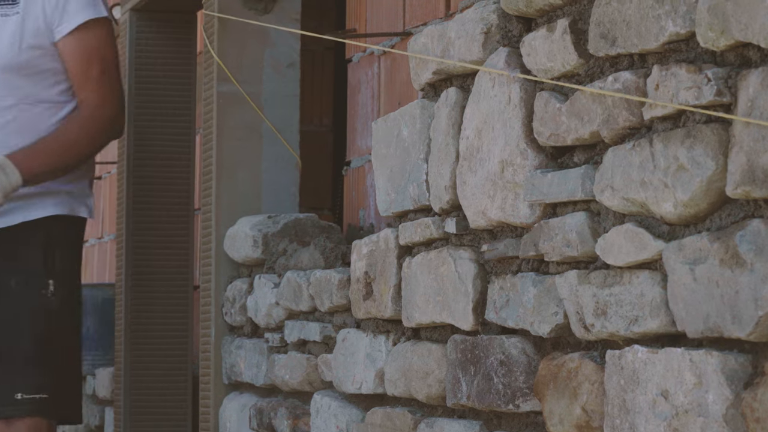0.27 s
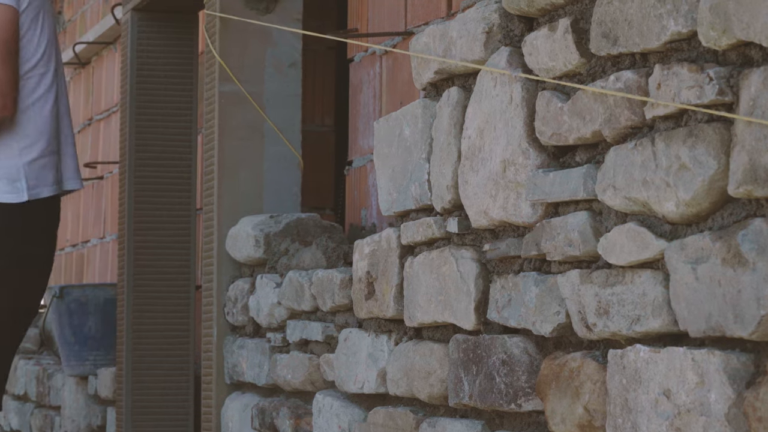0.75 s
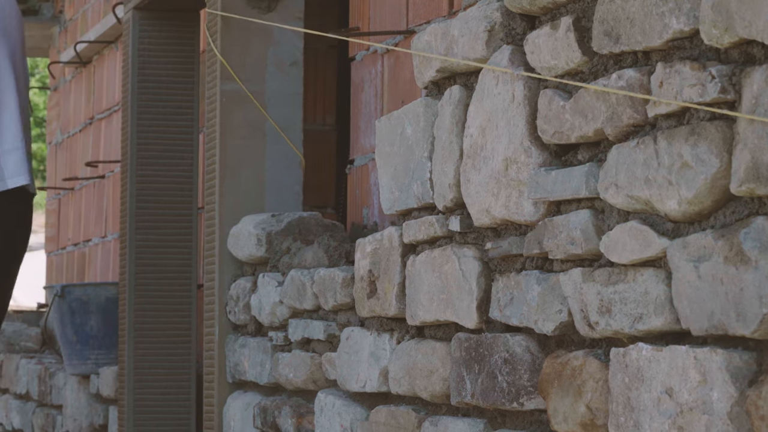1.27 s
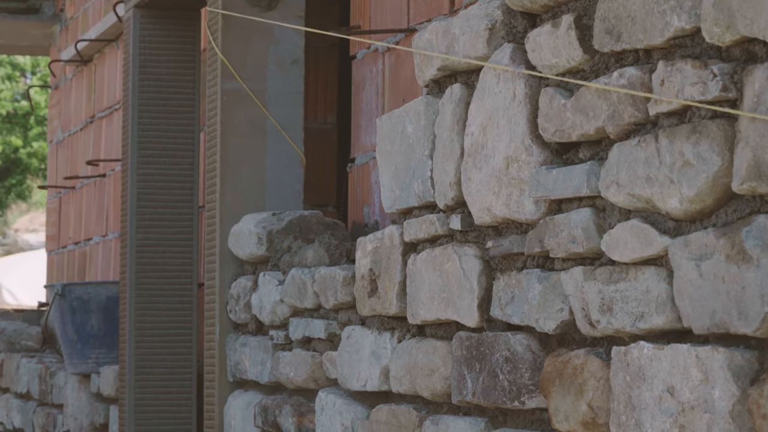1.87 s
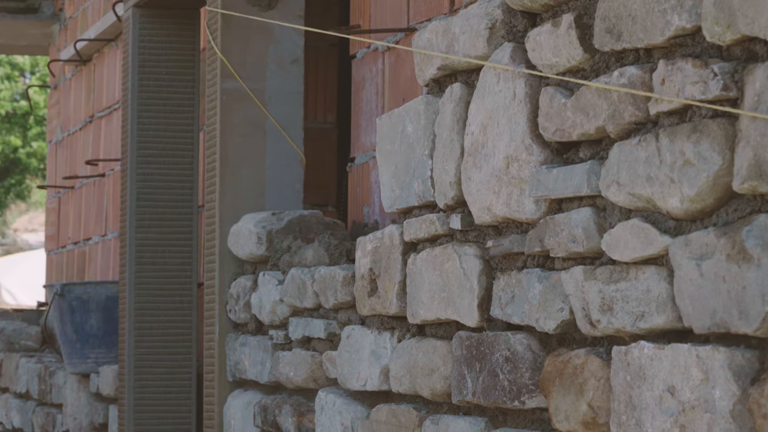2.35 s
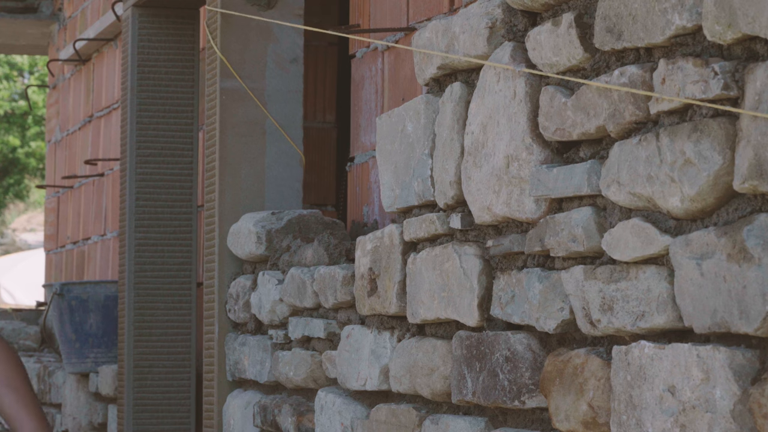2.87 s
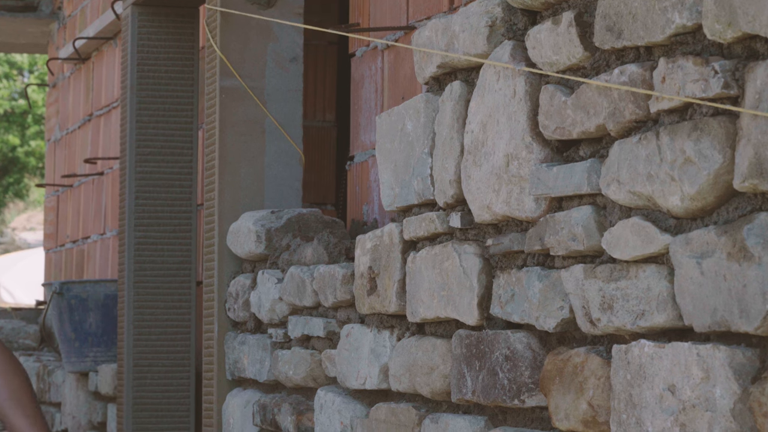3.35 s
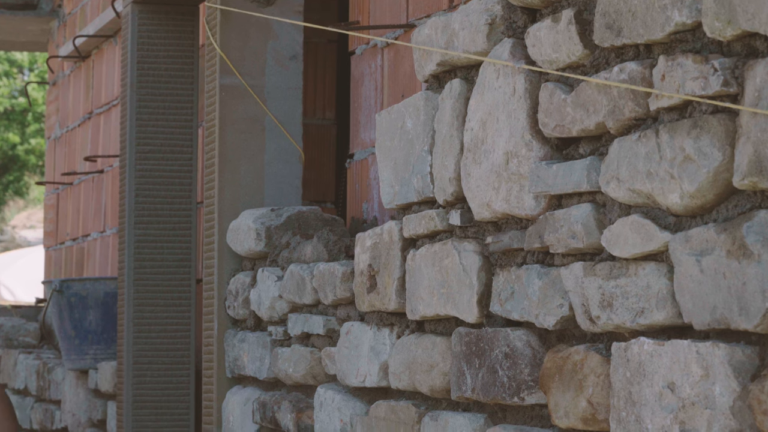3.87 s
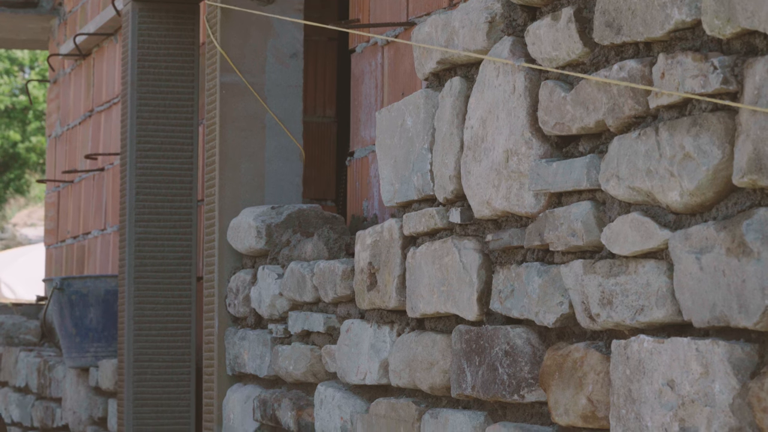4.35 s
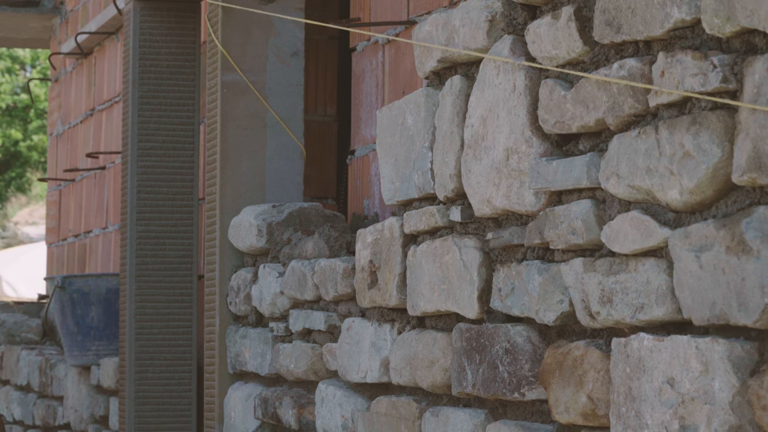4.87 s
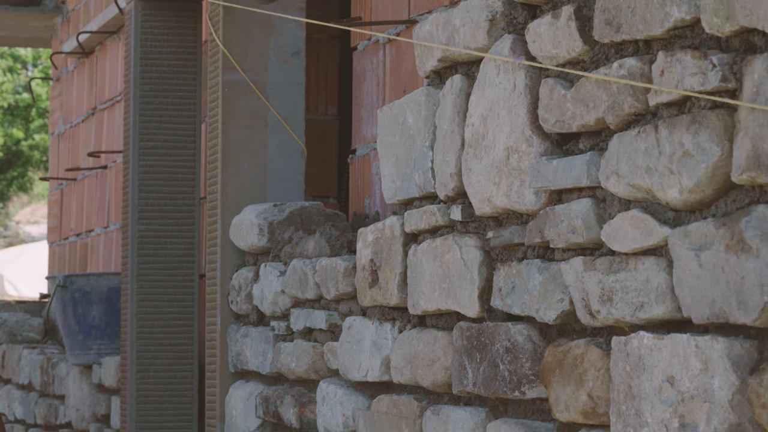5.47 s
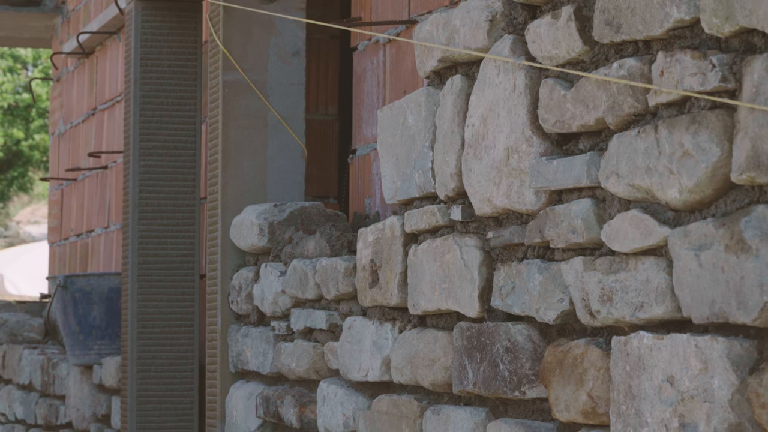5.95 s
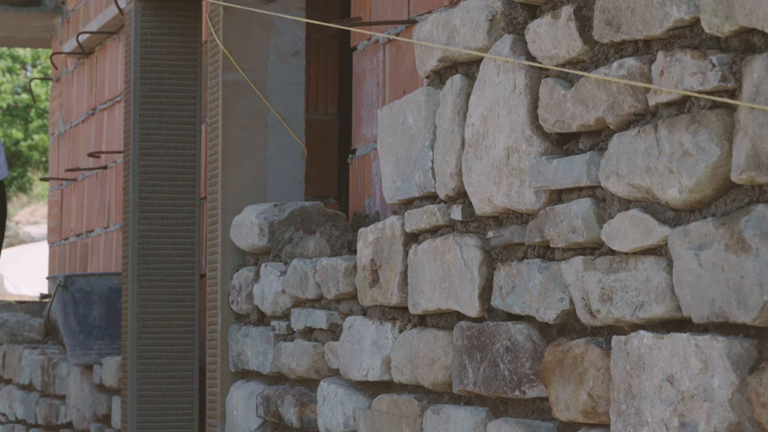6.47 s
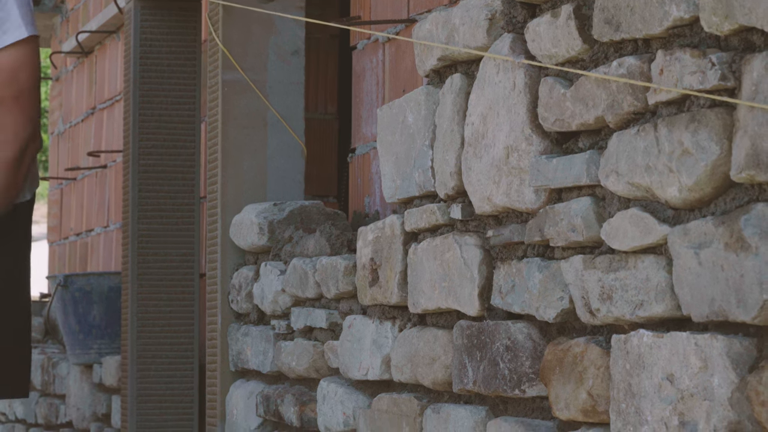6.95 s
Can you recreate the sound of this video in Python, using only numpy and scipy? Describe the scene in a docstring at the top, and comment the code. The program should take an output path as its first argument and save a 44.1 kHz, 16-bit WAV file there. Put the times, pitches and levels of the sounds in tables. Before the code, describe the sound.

Faint stone ticks and grinding give way to loud sharp rock-on-rock clacks and mortar swishes, booming in a bare building before quiet blade scrapes.

```python
"""Inside a bare, half-built house, rough stones are picked from a pile, dropped and ground into place.
Knocks and chips are short bursts of shaped noise; grinding is noise that slips and catches.
A steel blade clinks and rasps through its resonances; close on the left, mortar hisses in gritty swishes.
The brick shell answers with a low boom of fading noise, over a faint outdoor hiss with thin tones."""
import sys
import numpy as np
from scipy import signal
from scipy.fft import rfft, irfft, next_fast_len
from scipy.io import wavfile
from scipy.ndimage import uniform_filter1d, map_coordinates

SR = 44100
rng = np.random.default_rng(int(sys.argv[2]) if len(sys.argv) > 2 else 0)


def pcm_store(signal):
    """Save signal as 16-bit PCM."""
    levels = np.round(np.clip(np.atleast_2d(signal), -1, 1) * 32767)
    wavfile.write(sys.argv[1], SR, levels.astype(np.int16).T)


N = 317961  # length of the scene [samples]
TOP_HZ = 16100  # no sound is kept above this

# In every table, levels are relative. A "fade time" is the time to fall by 60 dB.
# stone on stone: (time [s], level [dB], hardness [0-1], ring pitch [Hz], basic fade time [s])
STONE_KNOCKS = [(0.175, -43, 0.97, 950, 0.19), (0.320, -39.5, 0.5, 498, 0.35),
                (0.878, -40.5, 1, 1070, 0.38), (1.921, -40, 1, 914, 0.17), (3.153, -29, 0.32, 947, 0.36),
                (3.178, -28.5, 0.4, 890, 0.36), (3.3577, -4, .88, 793, 0.34),
                (3.397, -10.5, 0.93, 629, 0.55), (3.544, -22.5, 0.96, 884, .16), (3.636, -20, 0, 864, 0.39),
                (3.673, -15, 1, 938, 0.37), (3.775, -12, 0.87, 674, 0.29), (4.596, -20, 0.69, 1100, 0.32),
                (4.676, -20.5, 0, 914, 0.18), (4.79, -25.5, 0, 960, 0.26), (4.882, -36.5, 1, 920, .2),
                (4.965, -14, 0, 556, 0.17), (5.305, -17, 0.48, 850, 0.2), (5.318, -4, 0.81, 843, 0.23),
                (5.427, -18.5, 0.3, 778, 0.21), (5.879, -24, 0.04, 933, 0.3),
                (5.938, -16.5, 0.08, 603, 0.18)]
# small chips that fall, and a few short, dead stone knocks: (time [s], level [dB], ring pitch [Hz])
DRY_TICKS = [(0.142, -48.5, 900), (1.561, -50, 694), (1.674, -42, 800), (3.207, -33, 780),
             (5.112, -23, 795), (5.202, -36, 847), (5.257, -39, 900), (6.167, -39, 800),
             (6.854, -29, 1000), (6.905, -41, 980), (6.948, -38, 955)]
# one push of a stone over another: (time [s], length [s], grind level [dB], sand level [dB])
STONE_PUSHES = [(0.41, 0.18, -53, -54.5), (0.69, 0.17, -74, -53.5), (1.058, 0.066, -52, -50),
                (1.579, 0.093, -47, -46.5), (1.742, 0.082, -76, -50.5), (2.617, 0.087, -58.5, -49.5),
                (2.726, 0.17, -54, -53), (2.929, 0.053, -38, -44), (2.984, 0.041, -36, -49),
                (3.2, 0.057, -35, -43), (3.426, 0.045, -24, -45), (3.512, 0.12, -31, -41),
                (3.664, 0.12, -22, -27), (4.046, 0.048, -50.5, -51), (4.386, 0.074, -56, -51.5),
                (4.606, 0.048, -27.5, -71), (4.87, 0.14, -32, -42.5), (5.123, 0.026, -35, -46.5),
                (5.236, 0.16, -39.5, -60), (6.86, 0.21, -48.5, -55), (7.141, 0.051, -51.5, -48)]
# the blade on stone: (time [s], level [dB], contact length [s], centre of the rasp [Hz])
BLADE_TOUCHES = [(3.36, -26, 0.1, 5060), (3.672, -27, .005, 6500), (3.767, -26, 0.0037, 6560),
                 (4.756, -45.5, 0.022, 4070), (4.884, -46.5, 0.014, 3500), (6.428, -41, .03, 3900),
                 (6.593, -41.5, 0.031, 1620), (6.750, -41.5, 0.022, 4350), (7.052, -39.5, 0.0089, 3800)]
# quick scrapes through mortar: (time [s], level [dB], rise [s], length [s], brightness [dB per octave])
MORTAR_SCRAPES = [(2.059, -25.5, 0.0025, 0.049, 3.5), (5.439, -22.5, 0.0044, 0.055, 3.5),
                  (6.329, -43.5, .04, 0.071, 1.5), (7.055, -37, 0.0013, 0.011, -1)]
# resonances of the steel blade: (frequency [Hz], width [Hz], level [dB])
STEEL_MODES = [(1270, 45, 14), (2000, 60, 6), (2480, 40, -2), (3730, 30, -2), (3993, 25, 0), (4180, 45, -1),
               (4284, 22, -3), (4477, 14, -1), (5290, 70, 0), (5470, 60, 4), (5660, 40, -1), (5840, 60, -1),
               (6240, 7, 4), (7046, 50, 0), (8429, 25, -5)]
# resonances of the pile and its corner: (frequency [Hz], width [Hz], level [dB])
CORNER_MODES = [(138, 4.4, 6.5), (244.5, 7.4, 9), (289.6, 12, 3.5), (361.6, 16, 2.5), (403, 12, -22),
                (533, 2.3, 1.5), (639.5, 12.5, 5), (722, 34, 2.5), (836, 3.1, 5.5), (931, 153, 2.5),
                (1030, 10, 2), (1105, 7.7, 8), (1346, 21, 1), (1500, 4.4, -31), (1670, 11, 0.5),
                (2000, 21, -14)]
# tone colour of a stone blow: (frequency [Hz], level [dB per Hz])
STONE_COLOUR = [(30, -62), (70, -22), (120, -25), (190, -10.5), (250, 1), (400, 3), (500, 4.5), (750, 6),
                (1100, 1), (1800, -22), (3200, -30), (5600, -29), (8000, -39), (16000, -50.5)]
# tone colour of stone grinding on stone: (frequency [Hz], level [dB per Hz])
GRIND_COLOUR = [(47, -74), (80, -16), (162, -18), (260, -5.5), (552, -4), (902, -5.5), (1190, -8),
                (1310, -6.5), (1790, -16.5), (3290, -31), (4000, -22), (5200, -44), (8800, -120)]
# tone colour of sand crunching: (frequency [Hz], level [dB per Hz])
SAND_COLOUR = [(800, -38), (2000, 7.5), (4000, 4), (6000, 4), (9000, -3), (16000, -9)]
# tone colour of scraped mortar: (frequency [Hz], level [dB per Hz])
MORTAR_COLOUR = [(120, -30.5), (220, -19), (450, -1), (1000, -3), (1400, 5.5), (2200, 5), (3200, 0.5),
                 (5500, -4.5), (8000, -0.5), (10500, -4.5), (14000, -15.5), (16000, -13.5)]
# tone colour of the outdoor hiss: (frequency [Hz], level [dB per Hz])
AIR_COLOUR = [(18, -81.5), (30, -47.5), (157, -14.5), (345, -12), (526, -6), (780, -8), (1390, -10),
              (1670, -10.5), (1810, -10), (3060, -14.5), (3580, -15), (6380, -16), (7870, -16),
              (16000, -21)]
# slow drift of the outdoor hiss: (time [s], level [dB])
AIR_DRIFT = [(0, -56.5), (2.4, -57), (4.4, -54.5), (5.8, -54), (7.2, -52.5)]
# faint, thin tones: (frequency [Hz], level [dB])
THIN_TONES = [(1775, -69), (3560, -73), (7697, -73.5)]
# how alike left and right are, for sound from the house: (frequency [Hz], likeness [-1 to 1])
HOUSE_LIKENESS = [(150, .998), (400, 0.98), (900, 0.83), (1600, 0.41), (2800, 0.024), (6000, 0.041)]
# the same for near sound from the left: (frequency [Hz], likeness [-1 to 1])
NEAR_LIKENESS = [(400, 0.75), (900, 0.73), (1600, -0.44), (4000, -0.64), (8000, 0.39), (15000, -0.38)]
# the same for open air: (frequency [Hz], likeness [-1 to 1])
OPEN_LIKENESS = [(150, 0.97), (450, 0.71), (1000, 0.3), (2500, -0.36), (6000, -0.06)]
# how far the work leans to the left: (frequency [Hz], left minus right [dB])
LEFT_LEAN = [(300, -1.5), (700, 1.5), (1400, 3), (3000, 1.3), (9000, 1.5)]
# the ringing brick shell: (frequency [Hz], fade time [s], level [dB])
BRICK_SHELL = [(112, 2.78, 4.5), (278, 1.08, 2.5), (980, 1.08, -4), (2500, 0.83, -3), (6000, 0.72, -2),
               (14000, 0.6, -20)]

# what hardness does to each band, low to high:
# (share when soft [dB], share when hard [dB], life [times the basic fade time])
THUD, BODY, CLACK, CRACK = (-16, -21, 0.9), (-11.5, -10.5, 1), (-25, -9.5, 1.04), (-44, -13.5, 0.89)
# every push takes hold, bears down harder to its end, then lets go
PUSH_RISE_S, PUSH_SWELL_DB, PUSH_RELEASE_T60 = 0.0089, 4, 0.27


def amp(db):
    """Turn decibels into a gain."""
    return 10 ** (np.asarray(db) / 20)


def unit(x):
    """Scale x to an rms of 1."""
    return x / np.sqrt(np.mean(x ** 2) + 1e-20)


def along(points, hz):
    """Read values between (frequency, value) points, on a log frequency axis."""
    f, v = np.transpose(points)
    return np.interp(np.log(hz + 1), np.log(f + 1), v)


def wobble(rate, size):
    """A smooth random curve with `rate` random points a second."""
    knots = rng.standard_normal(int(size * rate / SR) + 4)
    return map_coordinates(knots, [np.arange(size) * rate / SR])


def filtered(x, response):
    """Shape x by a gain that depends on frequency."""
    n = x.shape[-1]
    padded = next_fast_len(n + SR // 8)
    spectrum = rfft(x, padded) * response(np.fft.rfftfreq(padded, 1 / SR))
    return irfft(spectrum, padded)[..., :n]


def resonances(modes, f):
    """Summed response of ringing modes, each given as (Hz, width in Hz, dB)."""
    return sum(amp(db) * 1j * f * w / (c * c - f * f + 1j * f * w) for c, w, db in modes)


def pair(alike, size):
    """White stereo noise whose two sides are as alike as the table says."""
    def middle_and_side(f):
        turn = np.arccos(np.clip(along(alike, f), -1, 1)) / 2
        return np.array([np.cos(turn), np.sin(turn)])

    mid, side = filtered(rng.standard_normal((2, size)), middle_and_side)
    return np.array([mid + side, mid - side])


def stroke(t, rise, hold, t60):
    """An envelope that rises, holds and dies away."""
    return (1 - np.exp(-t / rise)) * amp(-60 * np.maximum(t - hold, 0) / t60)


def add(track, s, sound):
    """Mix a sound into the track at s seconds."""
    part = track[:, round(s * SR):][:, :sound.shape[1]]
    part += sound[:, :part.shape[1]]


def air(level_db=3.0):
    """Outdoor hiss is shaped noise that drifts slowly, with a few thin wavering tones."""
    t = np.arange(N) / SR
    hiss = unit(filtered(pair(OPEN_LIKENESS, N), lambda f: amp(along(AIR_COLOUR, f))))
    hiss_db = np.interp(t, *np.transpose(AIR_DRIFT)) + level_db
    waver = 3 * np.array([wobble(17, N), wobble(20, N)])  # phase [radians], one curve a side
    tones = sum(amp(db) * unit(np.sin(2 * np.pi * hz * t + waver)) for hz, db in THIN_TONES)
    return amp(hiss_db) * hiss + tones


def chips(width_hz=220, t60=0.067, level_db=-4, hold_s=0.0035, dull_hz=1700):
    """Small pieces land, and some short blows die at once, with a dry tick: a tiny noise burst through a broad
    resonance."""
    out, t = np.zeros((2, N)), np.arange(SR // 8) / SR
    for s, db, hz in DRY_TICKS:
        modes = [(hz, width_hz, 0), (2000, 500, -14)]
        colour = lambda f: resonances(modes, f) / np.sqrt(1 + (f / dull_hz) ** 6)
        burst = pair(HOUSE_LIKENESS, len(t)) * stroke(t, 0.0012, hold_s, t60)
        tick = filtered(burst, colour)
        add(out, s, amp(db + level_db) * tick / np.std(tick[:, :SR // 100]))
    return out


def shell(x):
    """The bare rooms ring on as a tail of fading noise, longest in the bass."""
    hz, t, noise = signal.stft(pair(HOUSE_LIKENESS, SR * 3 // 2), SR, nperseg=512)
    t60 = along([(f, life) for f, life, db in BRICK_SHELL], hz)[:, None]
    colour_db = along([(f, db) for f, life, db in BRICK_SHELL], hz)[:, None]
    fading = noise * amp(colour_db - 60 * t / t60) * (1 - np.exp(-t / 0.0022))
    tail = signal.istft(fading, SR, nperseg=512)[1]
    return signal.fftconvolve(x.mean(0)[None], tail / np.sqrt(SR / 10), axes=1)[:, :N]


def facets(f, count=10):
    """Every rough stone has its own scatter of narrow upper resonances."""
    centres = np.geomspace(1400, 9000, count) * np.exp(.1 * rng.standard_normal(count))
    modes = [(hz, 35 + hz / 150, 5) for hz in centres]
    return np.sqrt(1 + np.abs(resonances(modes, f)) ** 2)


def knocks(ring_db=-5.5, ring_t60=0.11, snap_db=-2, snap_t60=0.012, edge_db=8, rattle_db=2,
           heft_db=6, soft_rise_s=0.0024, click_db=-15, click_t60=.03):
    """Each blow is a snap, a short ring and a dense scatter off the near walls; hard contacts reach higher."""
    out, t = np.zeros((2, N)), np.arange(SR * 2 // 3) / SR
    edges = [20, 400, 1600, 3200, 20000]  # borders of the four bands [Hz]
    for s, db, hardness, hz, t60 in STONE_KNOCKS:
        # soft contacts take hold slowly
        attack = 1 - np.exp(-t / (0.00053 + soft_rise_s * (1 - hardness) ** 2))
        stone = lambda f: amp(along(STONE_COLOUR, f)) * facets(f)
        noise = filtered(pair(HOUSE_LIKENESS, len(t)), stone)
        rattle = amp(rattle_db * wobble(219, len(t)))  # rough faces touch at many points
        for lo, hi, (soft_db, hard_db, life) in zip(edges, edges[1:], [THUD, BODY, CLACK, CRACK]):
            band = filtered(noise, lambda f: 1 / (1 + (f / hi) ** 10) - 1 / (1 + (f / lo) ** 10))
            # the first contact is brightest
            snap = amp(snap_db + edge_db * (lo > 2000) - 60 * t / snap_t60)
            envelope = stroke(t, .003, .006, t60 * life) + snap
            blow = band * attack * envelope * rattle
            # heavy blocks rumble longer and thud more
            weight_db = heft_db * np.log2(t60 / 0.23) * (lo == edges[0])
            share_db = soft_db + hardness * (hard_db - soft_db) + weight_db
            add(out, s, amp(db + share_db) * blow / np.std(blow[:, :SR // 40]))
        # only a really hard contact chips the edge with a clear white-noise click
        click = pair(HOUSE_LIKENESS, len(t)) * stroke(t, .001, 0, click_t60)
        add(out, s, amp(db + click_db) * np.clip(hardness, 0, 1) ** 6 * click)
        # the block's own two lowest modes, each a close pair that beats
        for ratio, mode_db in [(1, 0.5), (1.5, -3)]:
            twins_hz = hz * ratio * (1 + 0.013 * rng.standard_normal((2, 1)))
            phase = 2 * np.pi * (twins_hz * t + rng.random((2, 1)) / 3)
            ring = np.sin(phase).mean(0)
            fade = amp(db + ring_db + mode_db - 60 * t / ring_t60)
            add(out, s, (fade * attack * ring)[None])
    return out


def hollow(f, depth=0.52):
    """The direct sound plus the ringing of the pile's corner."""
    return (1 + depth * resonances(CORNER_MODES, f)) / (1 + 0.34 * depth)


def low_cut(f, corner_hz=135, leak_db=-34):
    """Stones this small radiate little deep bass."""
    s = 1j * f / corner_hz
    return s ** 3 / (1 + 2 * s + 2 * s ** 2 + s ** 3) + amp(leak_db)


def catches(rate, spread_db, t60):
    """Stick-slip: sudden catches of random size, each dying away, evened out over a short while."""
    sizes = amp(spread_db * rng.standard_normal(N)) ** 2
    jolts = (rng.random(N) < rate / SR) * sizes
    power = signal.lfilter([1], [1, -amp(-60 / (t60 * SR)) ** 2], jolts) + 0.09
    return np.sqrt(power / uniform_filter1d(power, SR // 16))


def drags(grain_db=2.0, sand_follows=0.11):
    """Stone slips and catches on stone under each push, and sand crunches between the faces."""
    t, pressure = np.arange(SR) / SR, np.zeros((2, N))
    for s, length, grind_db, sand_db in STONE_PUSHES:
        swell = amp(PUSH_SWELL_DB * (np.minimum(t / length, 1) - 1.5))
        push = stroke(t, PUSH_RISE_S, length, PUSH_RELEASE_T60) * swell
        add(pressure, s, amp([[grind_db], [sand_db]]) * push)
    grind, sand = pressure
    slips = catches(rate=260, spread_db=3.8, t60=.05)  # rate in catches a second
    body = unit(filtered(pair(HOUSE_LIKENESS, N) * slips, lambda f: amp(along(GRIND_COLOUR, f))))
    # the sand follows the slips only weakly and has a finer grain
    grains = pair(HOUSE_LIKENESS, N) * slips ** sand_follows * amp(grain_db * wobble(900, N))
    crunch = unit(filtered(grains, lambda f: amp(along(SAND_COLOUR, f))))
    return grind * body + sand * crunch


def tilt(f, db_per_octave):
    """A slope in brightness that pivots at 3000 Hz and is level below 600 Hz."""
    return amp(db_per_octave * np.log2(np.maximum(f, 600) / 3000))


def swishes(grain_db=1.5, left_db=2, fade_t60=0.19):
    """Sandy mortar hisses under a quick stroke; the wall right behind combs the sound."""
    out, t = np.zeros((2, N)), np.arange(SR // 2) / SR
    echo, wall_delay_s = .33, np.array([[.00142], [.00108]])  # echo gain; delay left, right
    for s, db, rise, length, bright in MORTAR_SCRAPES:
        comb = lambda f: 1 + echo * np.exp(-2j * np.pi * f * wall_delay_s)
        colour = lambda f: amp(along(MORTAR_COLOUR, f)) * tilt(f, bright) * comb(f)
        grains = pair(NEAR_LIKENESS, len(t)) * amp(grain_db * wobble(1087, len(t)))
        hiss = unit(filtered(grains, colour))
        add(out, s, amp(db) * hiss * stroke(t, rise, length, fade_t60))
    return out * amp([[left_db], [-left_db]])


def blade(fade_t60=0.2, grain_db=1.0, grit_db=-25, spill_db=-16, bite_db=6, bite_t60=.04):
    """The steel edge bites, then grit catches it; a higher rasp drives higher modes, each at a new strength."""
    out, t = np.zeros((2, N)), np.arange(SR // 2) / SR
    for s, db, contact, centre_hz in BLADE_TOUCHES:
        modes = [(hz, width, level + rng.standard_normal()) for hz, width, level in STEEL_MODES]
        # higher rasps bite harder
        bite = amp(bite_db - 60 * t / bite_t60) * (centre_hz / 7000) ** 2
        envelope = stroke(t, 0.0028, contact, fade_t60) + bite
        rasp = pair(HOUSE_LIKENESS, len(t)) * envelope * amp(grain_db * wobble(494, len(t)))
        steel = lambda f: resonances(modes, f) + amp(grit_db)
        drive = lambda f: resonances([(centre_hz, centre_hz / 2, 0)], f) + amp(spill_db)
        ring = filtered(rasp, lambda f: steel(f) * drive(f))
        add(out, s, amp(db) * ring / np.std(ring[:, :SR // 25]))
    return out


def scene():
    """Work in the house, a little to the left, with its boom; near scrapes; open air."""
    stones = filtered(knocks() + drags(), lambda f: hollow(f) * low_cut(f))
    work = stones + chips() + blade()
    near = swishes()
    lean = lambda f: amp(np.array([along(LEFT_LEAN, f), -along(LEFT_LEAN, f)]) / 2)
    placed = filtered(work, lean)
    boom = amp(-11) * shell(work + amp(3.0) * near)
    return placed + near + boom + air()


def record(dry):
    """The loudest peaks are rounded off at full scale; nothing is kept above the band limit."""
    rounded = dry / (1 + np.abs(dry) ** 8) ** (1 / 8)
    return filtered(rounded, lambda f: f < TOP_HZ)


dry = scene()
out = record(dry)
pcm_store(out)
```